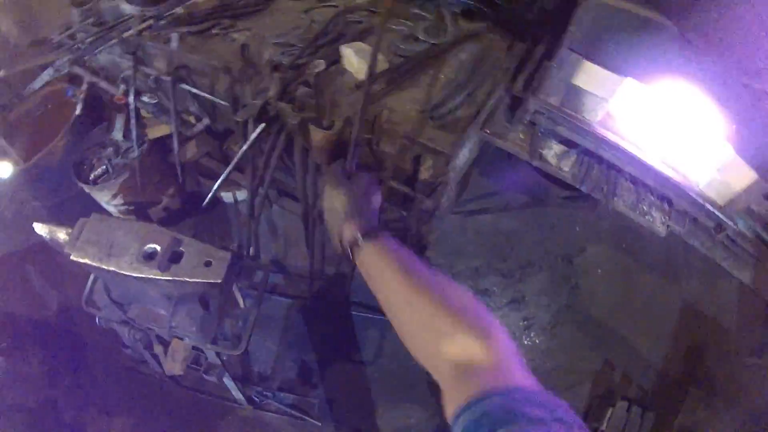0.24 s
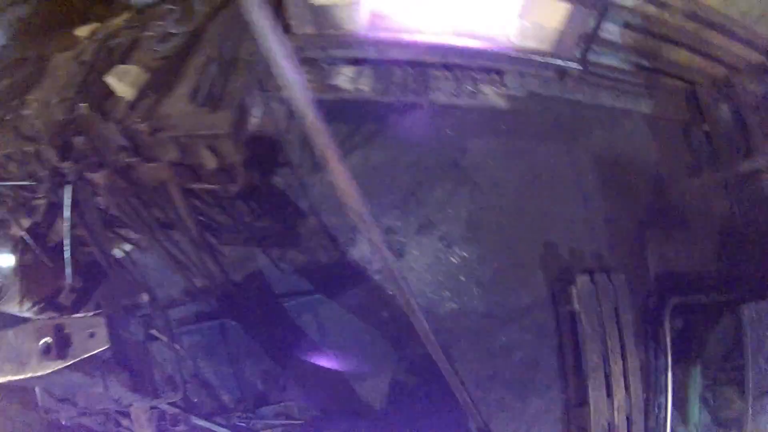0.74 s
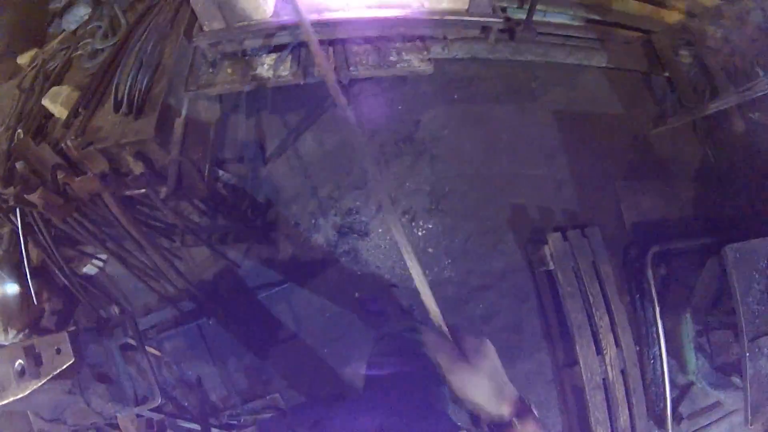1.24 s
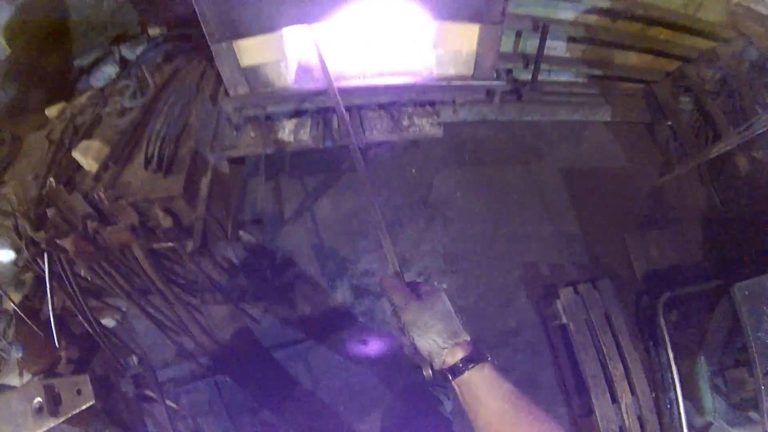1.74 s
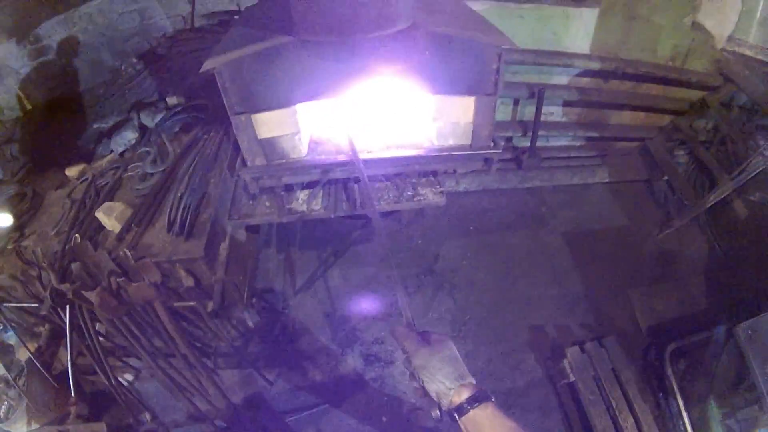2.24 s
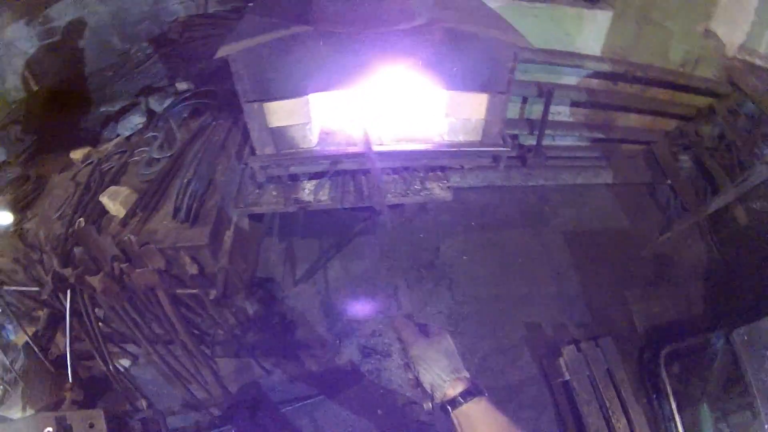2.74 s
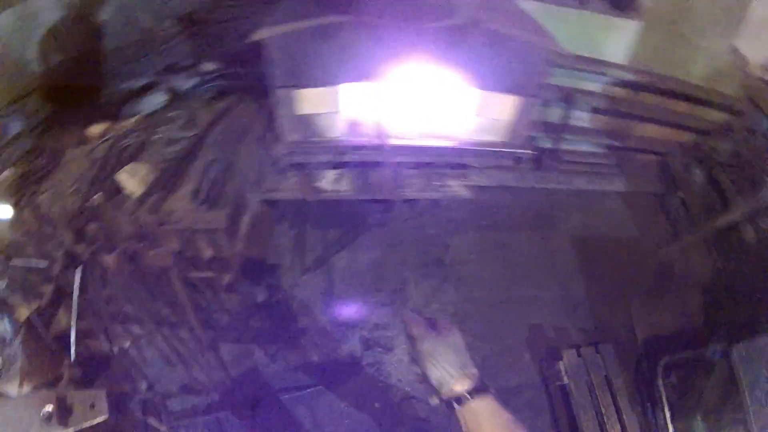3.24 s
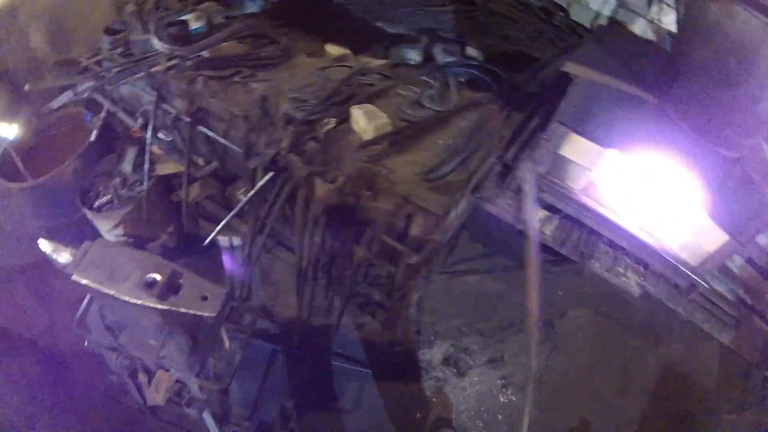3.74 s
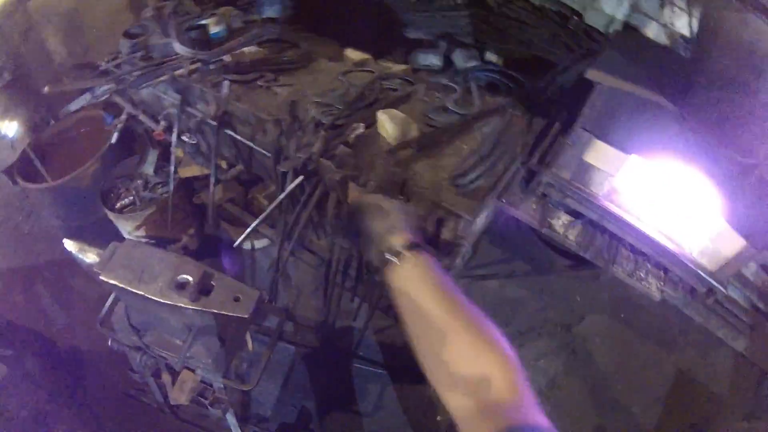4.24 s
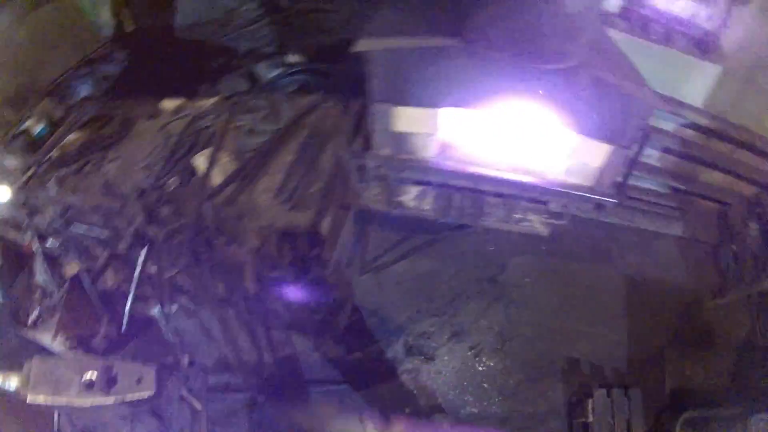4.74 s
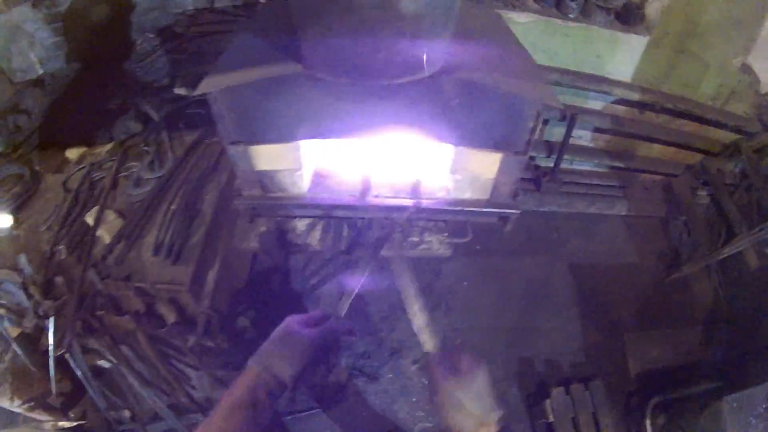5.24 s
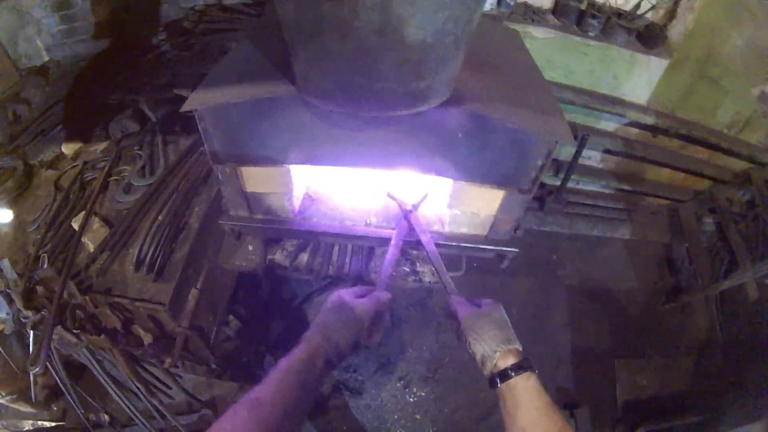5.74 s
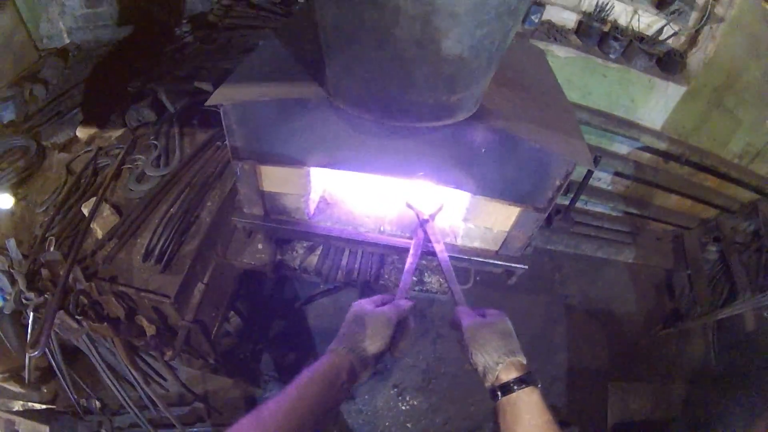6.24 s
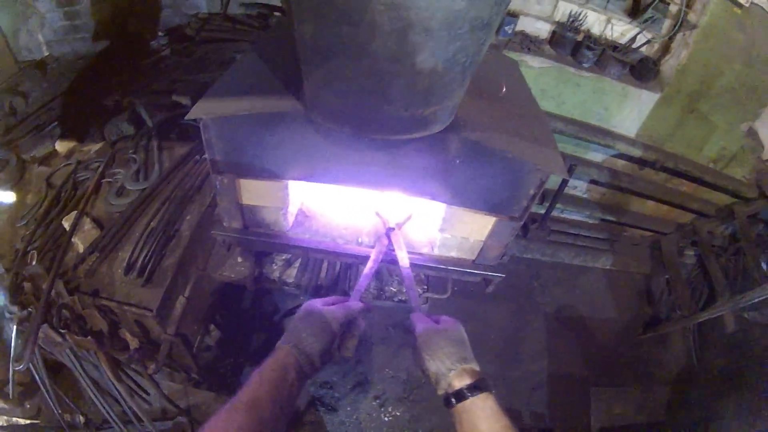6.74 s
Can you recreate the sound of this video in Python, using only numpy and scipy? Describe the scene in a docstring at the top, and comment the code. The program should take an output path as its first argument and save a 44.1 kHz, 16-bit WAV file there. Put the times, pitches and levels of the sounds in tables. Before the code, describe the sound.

Steady gas burner hiss in a smithy, broken by light scrapes and a quick run of steel clinks, then growing slightly fuller.

```python
"""A gas forge burns steadily in a smithy, heard through a cased microphone on the smith's head.
From the start the jet's hiss, coloured by the resonances of the case, sits over a soft flame roar,
the mix shifting as he turns. Just after 1 s he slides a rod into the fire with three short scrapes.
Around 4 s he drags tongs off the tool pile, steel catching and sliding on steel.
Then he steps in close and the burner grows fuller."""
import sys
import numpy as np
from scipy import signal
from scipy.fft import rfft, irfft
from scipy.io import wavfile
from scipy.ndimage import uniform_filter1d, map_coordinates

SR = 44100
rng = np.random.default_rng(int(sys.argv[2]) if len(sys.argv) > 2 else 0)


def int16_out(signal):
    """Quantize to a 16-bit WAV file."""
    q = np.round(np.clip(np.atleast_2d(signal).T, -1, 1) * 32767)
    wavfile.write(sys.argv[1], SR, q.astype(np.int16))


N = 309141
TIME = np.arange(N) / SR
BIN_HZ = np.maximum(np.arange(N // 2 + 1) * SR / N, 1)

# the smith turns between tool pile and fire, then steps in: t/s, turned away/0-1, closeness/0-1
SMITH_POSE = [(0, 1, 0.24), (.25, 1, 0.1), (.65, 0, 0.43), (3.25, 0.54, 0), (3.75, 0.6, 0.14),
              (4.25, 0.7, 0.6), (4.7, 0.25, 0), (5.0, 0.4, 0.45), (5.55, 0.5, 0.98), (7, 0, 0.94)]
# the forge mix, one fader a layer: level facing the fire/dB, change turned away/dB, change up close/dB
HISS_FADER = (-53, 0.15, 0.14)
LOW_FADER = (-57, 1.8, 4.5)
BODY_FADER = (-51.9, .3, .8)
MID_FADER = (-57.5, -.8, .2)
HIGH_FADER = (-57, -1.2, 1.2)
UPPER_FADER = (-69.5, 0, 10.5)
SIZZLE_FADER = (-70.5, 2.6, 2.1)
WHISTLE_FADER = (-85, -1, 2.5)
FLAME_FADER = (-74.5, 0.27, 0.65)

# broad hiss of the jet: f/Hz, relative level/dB
JET_SPECTRUM = [(400, -52), (800, -20), (1100, -12.5), (1450, -4.5), (1700, -7.5), (2050, 1), (2330, 0.5),
                (2430, -2.5), (2800, -4), (3250, -2.5), (3560, -15.5), (4500, -19), (5100, -22.5),
                (5600, -23), (6200, -43), (7700, -37), (9000, -70)]
# resonances of the microphone's case, the upper one heard only up close: f/Hz, width/Hz, relative level/dB
LOW_MODES = [(1274, 58, -1.5), (1302, 24, -2.5), (1362, 140, 0)]
BODY_MODES = [(1636, 87, -6.5), (1808.3, 96, 3), (1906, 118, 0.5)]
MID_MODES = [(3020, 80, 0), (3035, 210, -1.5)]
HIGH_MODES = [(3815, 153, -5.5), (4045, 357, -4), (4498, 320, -11)]
UPPER_MODES = [(4142, 130, 0)]
# the narrow core of the mid resonance sings out: t/s, length/s, level/dB
SINGING = [(0.717, 0.4, -54), (1.86, 0.11, -46), (2.178, 0.71, -48.5), (2.947, 0.44, -51.5),
           (5.48, 0.34, -53.5)]
# the body resonances surge or sink briefly: t/s, length/s, change/dB
BODY_SURGES = [(1.25, 0.31, 2.5), (3.17, 0.49, -2), (4.98, 0.1, 3.5), (5.42, 0.1, 3.5), (5.71, 0.068, 4.5)]
# gas sizzling at the nozzle: f/Hz, relative level/dB
SIZZLE_SPECTRUM = [(7000, -20), (8300, -19), (9000, -3.5), (9550, -6.5), (9900, 1), (12500, 2.5),
                   (13200, -14.5), (13900, -15), (14650, -10), (15100, -10), (15700, -16), (17000, -36)]
# a bright band slides down as the head swings to the fire: t/s, length/s, starting f/Hz, resting level/dB
SHEEN_SWEEPS = [(-.05, 2.6, 10870, -86), (4.948, 2.1, 10100, -87)]
# the thin nozzle whistle flares up: t/s, length/s, rise/dB
WHISTLE_FLARES = [(1.73, .09, 7), (5.69, .12, 7), (6.09, .17, 7)]
# flame roar: f/Hz, relative level/dB
FLAME_SPECTRUM = [(20, -22), (45, -21), (90, -18), (125, -8), (170, -6), (220, -2), (300, -0.5),
                  (450, -0.5), (650, -5.5), (1000, -13.5), (2000, -45)]
# hollow notes of the fire chamber: f/Hz, width/Hz, relative level/dB
CHAMBER_MODES = [(181, 13.3, 2), (218, 9, 3), (295, 11.5, 7.5)]

# steel slides on steel, first the rod, then the tongs: t/s, length/s, relative level/dB
SCRAPES = [(1.168, 0.016, -50), (1.277, 0.013, -48.5), (1.356, 0.018, -49.5), (4.108, 0.038, -44),
           (4.152, 0.018, -42.5), (4.183, 0.12, -46), (4.318, 0.025, -51), (4.418, .05, -56)]
# ring of the steel tools: f/Hz, t60/s, relative level/dB
STEEL_MODES = [(1390, 0.044, -20), (1980, 0.13, -11), (2030, 0.076, -8), (2430, .06, -11), (2760, .07, -24),
               (2890, 0.11, 11), (2982, 0.042, 12), (3075, 0.039, 15.5), (3290, 0.062, 4.5),
               (3330, .05, -14), (3850, .04, -20), (4360, 0.072, -2.5), (4870, .05, -9), (5230, .05, -17),
               (5780, .05, -40), (6820, .04, -37)]
# EQ for the dry crack of steel on steel: f/Hz, relative level/dB
CRACK_EQ = [(150, -70), (700, -45), (1300, -21), (2050, 5.5), (3100, -32), (3600, -25), (4500, -3),
            (5300, -31), (6200, -34), (7500, -25), (12000, -55)]
# the tongs catch and knock: t/s, relative level/dB
TONG_KNOCKS = [(4.055, -33), (4.112, -24), (4.135, -27), (4.156, -22), (4.181, -20), (4.232, -20),
               (4.243, -17), (4.268, -21), (4.282, -27), (4.331, -26)]
# narrow dead spots of the cased microphone: f/Hz, width/Hz
CASE_NOTCHES = [(6020, 970), (8010, 260)]


def undb(db):
    """Decibels to gain."""
    return 10 ** (np.asarray(db) / 20)


def unit(x):
    """Scale to rms 1."""
    return x / np.sqrt(np.mean(x ** 2))


def wobble(rate_hz):
    """Smooth random modulation: sample-and-hold, slewed twice; rms 1."""
    hold = int(SR / rate_hz)
    steps = np.repeat(rng.standard_normal(N // hold + 1), hold)
    return unit(uniform_filter1d(uniform_filter1d(steps, hold), hold)[:N])


def gate(start, length, edge_s):
    """A soft-edged gate that opens for the given stretch."""
    return (np.tanh((TIME - start) / edge_s) - np.tanh((TIME - start - length) / edge_s)) / 2


def swells(table, edge_s):
    """Smooth swells and dips, in dB."""
    return sum(db * gate(start, length, edge_s) for start, length, db in table)


def ride(fader):
    """A layer's level in dB, riding the smith's pose."""
    level_db, turned_db, close_db = fader
    times, turned, close = np.transpose(SMITH_POSE)
    return level_db + np.interp(TIME, times, turned_db * turned + close_db * close)


def equalise(x, curve):
    """Filter by a curve of f/Hz, level/dB points."""
    hz, db = np.transpose(curve)
    gain = undb(np.interp(np.log(BIN_HZ), np.log(hz), db))
    return irfft(rfft(x) * gain, N)


def turbulence(spectrum):
    """Turbulent gas as shaped noise; rms 1."""
    return unit(equalise(rng.standard_normal(N), spectrum))


def resonate(modes, flutter_db, flutter_hz):
    """Steep resonances, each fed by its own noise and fluttering by flutter_db; rms 1."""
    out = 0
    for hz, width, db in modes:
        response = 1 / (1 + 1j * hz / width * (BIN_HZ / hz - hz / BIN_HZ))
        ring = irfft(rfft(rng.standard_normal(N)) * response ** 2, N)
        out = out + ring * undb(db + flutter_db * wobble(flutter_hz))
    return unit(out)


def reflections(x, echo_db, sway_ms, count=4):
    """Echoes off hood, floor and walls comb the hiss; their paths change as the head sways."""
    out = x
    for lag_ms in np.linspace(2.3, 11, count) * rng.uniform(.85, 1.15, count):
        lag = (lag_ms + sway_ms * wobble(1.3)) * SR / 1000
        echo = map_coordinates(x, [np.arange(N) - lag], order=3, mode="mirror")
        out = out + undb(echo_db) * echo
    return out / np.sqrt(1 + count * undb(2 * echo_db))


def burner():
    """The jet's hiss, coloured by the ringing of the microphone's case; all wavers with the gas flow."""
    hiss = undb(ride(HISS_FADER)) * reflections(turbulence(JET_SPECTRUM), echo_db=-14.5, sway_ms=.2)
    body_db = ride(BODY_FADER) + swells(BODY_SURGES, edge_s=.022)
    body = undb(body_db) * resonate(BODY_MODES, flutter_db=0, flutter_hz=16)
    low = undb(ride(LOW_FADER)) * resonate(LOW_MODES, flutter_db=1, flutter_hz=12)
    mid = undb(ride(MID_FADER)) * resonate(MID_MODES, flutter_db=1.2, flutter_hz=18)
    high_ring = resonate(HIGH_MODES, flutter_db=1, flutter_hz=18)
    high = undb(ride(HIGH_FADER)) * reflections(high_ring, echo_db=-12, sway_ms=.21)
    upper = undb(ride(UPPER_FADER)) * resonate(UPPER_MODES, flutter_db=2.5, flutter_hz=9)
    singing = sum(undb(db) * gate(start, length, edge_s=.092) for start, length, db in SINGING)
    note = singing * resonate([(3022, 105, 0)], flutter_db=.86, flutter_hz=10)
    flow = undb(.23 * wobble(18))
    return (hiss + body + low + mid + note + high + upper) * flow


def nozzle():
    """The top end: fine sizzle of escaping gas, its sliding sheen and a thin whistle, all flickering."""
    sizzle = undb(ride(SIZZLE_FADER)) * turbulence(SIZZLE_SPECTRUM)
    whistle_db = ride(WHISTLE_FADER) + swells(WHISTLE_FLARES, edge_s=.025)
    whistle = undb(whistle_db) * resonate([(15090, 340, 0)], flutter_db=2.5, flutter_hz=20)
    flicker = undb(.7 * wobble(24))
    return reflections(sizzle + sheen() + whistle, echo_db=-12.5, sway_ms=.15) * flicker


def sheen(rest_hz=8570, settle_s=.72, db_per_khz=10.5):
    """A bright band in the sizzle glides down toward its resting pitch and fades as it falls."""
    low_noise = turbulence([(1, -1), (170, 5), (400, -2), (900, -33), (3000, -90)])
    out = 0
    for start, length, hz, db in SHEEN_SWEEPS:
        above_hz = (hz - rest_hz) * np.exp(-np.maximum(TIME - start, 0) / settle_s)
        carrier = np.cos(2 * np.pi * np.cumsum(rest_hz + above_hz) / SR)
        band = unit(low_noise * carrier)  # ring modulation centres the noise on the glide
        out = out + band * undb(db + db_per_khz * above_hz / 1000) * gate(start, length, edge_s=.057)
    return out


def flame():
    """A soft low roar with the hollow notes of the fire chamber, a touch fuller up close."""
    hollow = undb(-7.5) * resonate(CHAMBER_MODES, flutter_db=1.8, flutter_hz=5)
    roar = turbulence(FLAME_SPECTRUM)
    return (roar + hollow) * undb(ride(FLAME_FADER) + .13 * wobble(3.9))


def scrapes(slips_per_s=7000, attack_s=.0054, release_s=.0097):
    """Stick-slip grains: friction bites quickly, holds while the steel moves, then dies away."""
    slips = (rng.random(N) < slips_per_s / SR) * rng.standard_normal(N)
    envelope = 0
    for start, length, db in SCRAPES:
        attack = np.clip((TIME - start) / attack_s, 0, 1)
        release = np.exp(-np.maximum(TIME - start - length, 0) / release_s)
        envelope = envelope + undb(db) * attack * release
    return unit(slips) * envelope


def steel(contact):
    """Each contact gives a damped ring and a dry crack; thin bars radiate almost no bass."""
    t = TIME[:SR // 8]
    ping = sum(undb(db - 60 * t / t60) * np.sin(2 * np.pi * hz * t) for hz, t60, db in STEEL_MODES)
    ring = undb(-.5) * signal.fftconvolve(contact, ping / np.linalg.norm(ping))[:N]
    crack = undb(7.5) * equalise(contact, CRACK_EQ)
    low_cut = signal.butter(4, 1200, "high", fs=SR, output="sos")
    return signal.sosfilt(low_cut, ring + crack)


def knocks():
    """The tongs catch on the pile, one hard impulse a blow."""
    blows = np.zeros(N)
    for start, db in TONG_KNOCKS:
        blows[int(start * SR)] += undb(db)
    return blows


def scene():
    """The forge bed with the steel tools on top, in mono."""
    forge = burner() + nozzle() + flame()
    tools = steel(scrapes() + knocks())
    return (forge + tools)[None]


def record(dry):
    """The cased microphone has two narrow dead spots; a steep high cut takes off the very top."""
    for hz, width in CASE_NOTCHES:
        dry = signal.lfilter(*signal.iirnotch(hz, hz / width, fs=SR), dry)
    high_cut = signal.ellip(12, .1, 70, 15700, fs=SR, output="sos")
    return signal.sosfilt(high_cut, dry)


dry = scene()
out = record(dry)
int16_out(out)
```